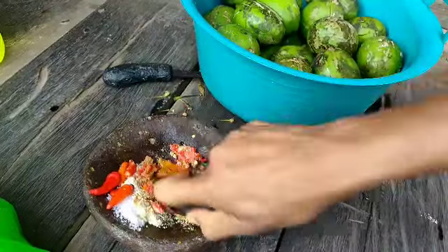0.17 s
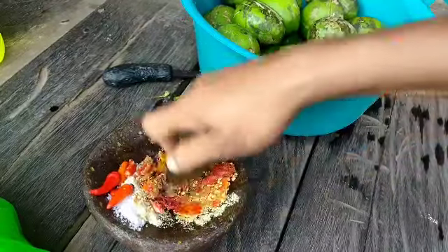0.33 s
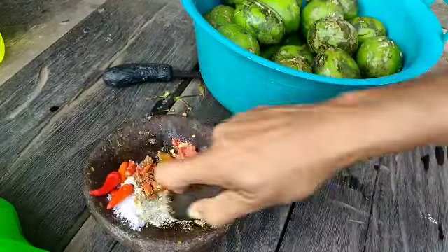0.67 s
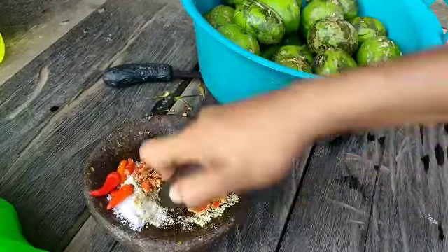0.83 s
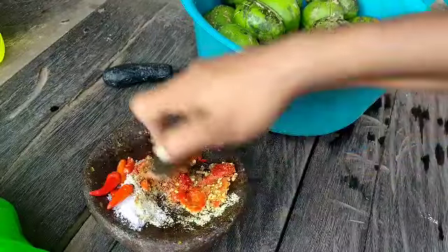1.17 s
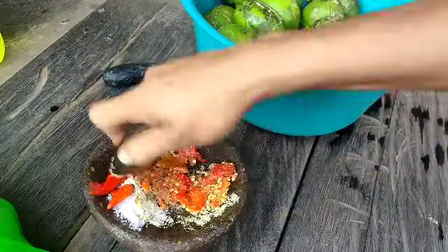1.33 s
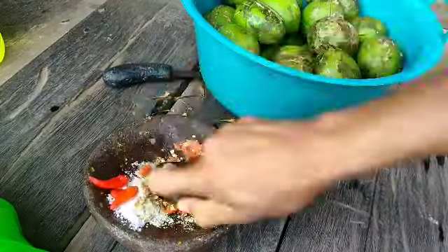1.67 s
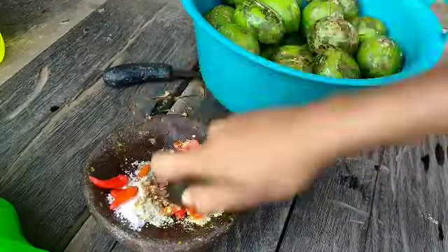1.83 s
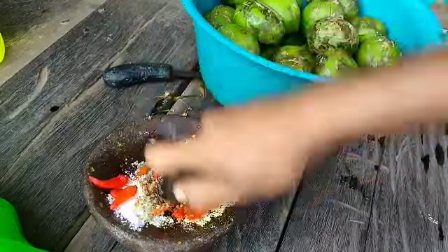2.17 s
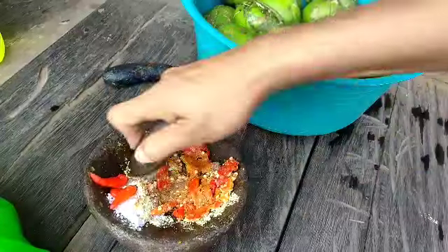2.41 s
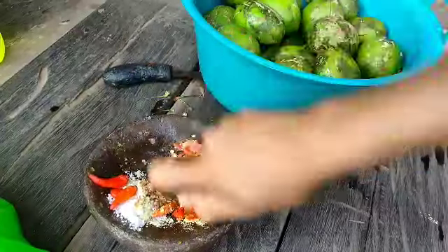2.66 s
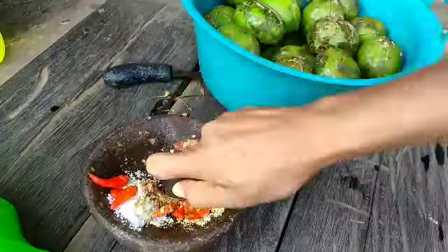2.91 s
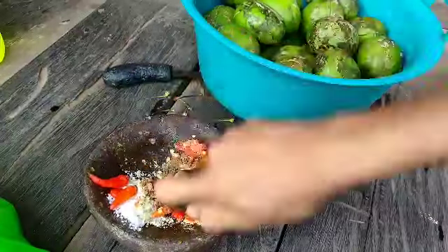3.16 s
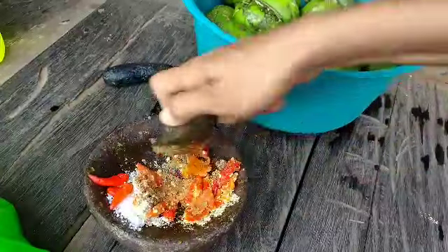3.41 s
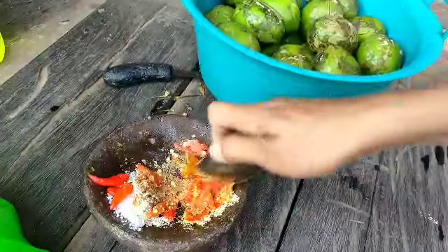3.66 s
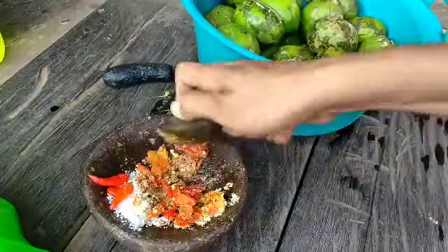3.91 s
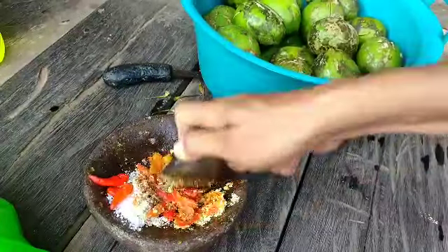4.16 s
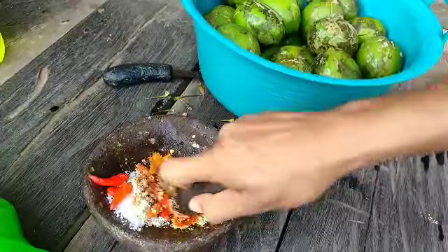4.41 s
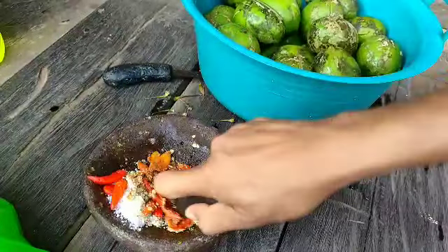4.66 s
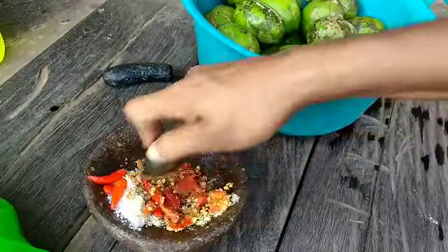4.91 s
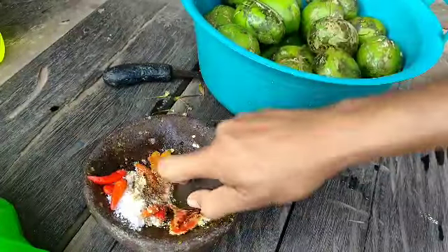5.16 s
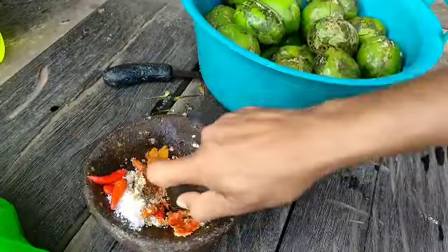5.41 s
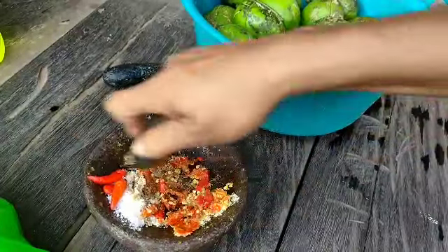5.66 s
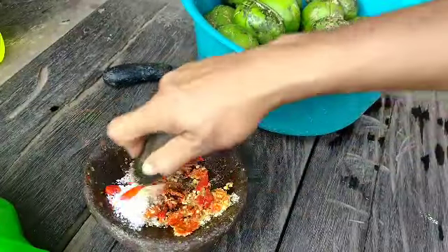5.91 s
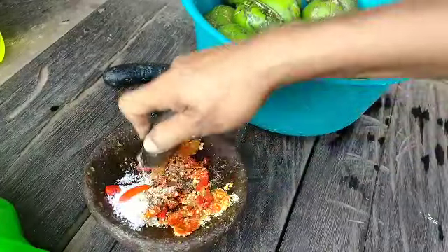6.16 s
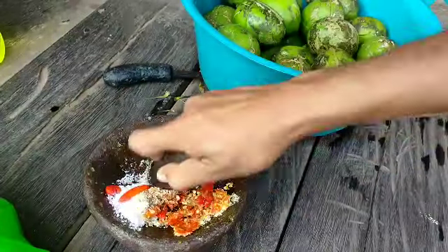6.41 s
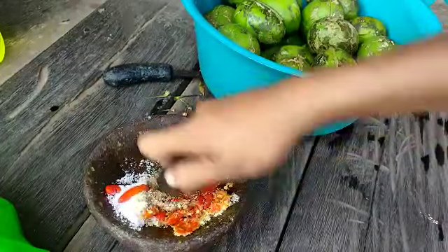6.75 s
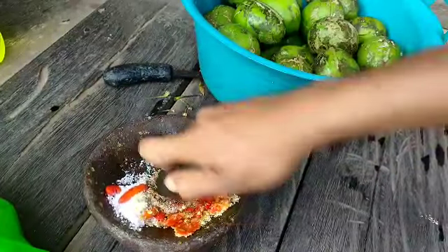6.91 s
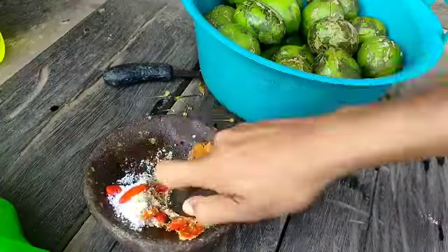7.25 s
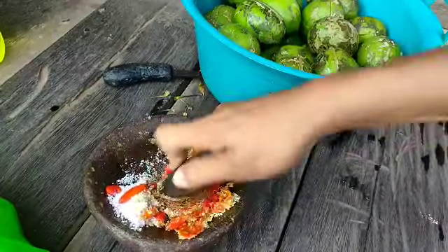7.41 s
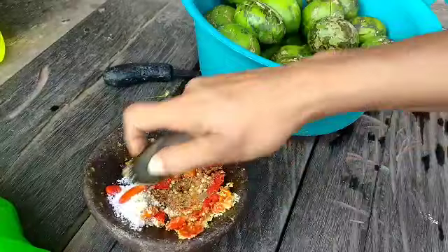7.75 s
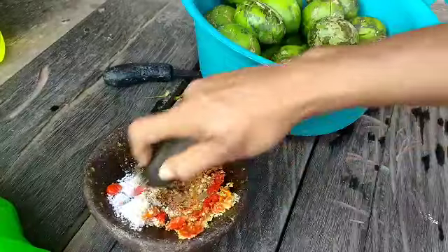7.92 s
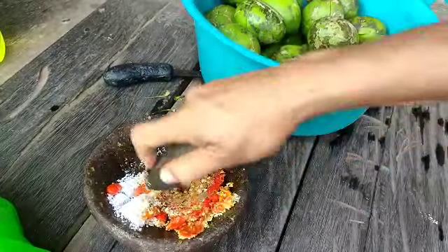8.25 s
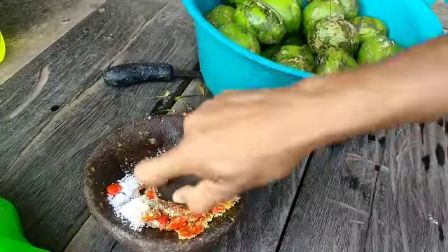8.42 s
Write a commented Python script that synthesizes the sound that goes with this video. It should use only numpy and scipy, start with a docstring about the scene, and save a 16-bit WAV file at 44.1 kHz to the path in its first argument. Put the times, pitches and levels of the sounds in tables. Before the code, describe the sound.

Irregular grinding, several strokes a second, stone against stone with gritty salt crackling between. Woody, hollow thumps pass into the table, small cracks and clacks dot the rubbing, and a pair of hard knocks stands out near the end before the work softens. The microphone is close and dry, in quiet open air, with thin distant insect bands, a weak sliding cicada buzz and low wind flutters on the right.

```python
"""Outdoors at a plank table, a stone pestle grinds chilies, spices and salt in a shallow stone mortar.
Each push rolls grit, as tiny jolts that ring the modes of mortar and planks, while salt crunches in noise
bursts and hard grains rasp. Seeds snap, the stones clack, and now and then the pestle knocks.
Far insects sing in shimmering noise bands, a nearer cicada buzzes in a narrow one, and puffs of air buffet
the right microphone port."""
import sys
import numpy as np
from scipy import signal
from scipy.fft import rfft, irfft, next_fast_len
from scipy.io import wavfile
from scipy.ndimage import uniform_filter1d, map_coordinates

SR = 44100
rng = np.random.default_rng(int(sys.argv[2]) if len(sys.argv) > 2 else 0)


def output_pcm(signal):
    """Save a mono or channel-first signal as 16-bit PCM at the path in sys.argv[1].

    Samples are clipped to [-1, 1] before scaling.
    """
    pcm = np.clip(np.atleast_2d(signal).T, -1, 1) * 32767
    wavfile.write(sys.argv[1], SR, np.round(pcm).astype(np.int16))


N = 378201
TIME = np.arange(N) / SR


def from_db(db):
    """Decibels to gain."""
    return 10 ** (np.asarray(db) / 20)


def rms_one(x):
    """Scale to unit rms."""
    return x / np.sqrt(np.mean(x ** 2) + 1e-20)


def in_time(rows):
    """Each column of a curve, interpolated sample by sample."""
    s, *columns = np.transpose(rows)
    return [np.interp(TIME, s, column) for column in columns]


def coloured(x, spectrum):
    """Causal (minimum-phase) filter that follows a spectrum."""
    size = next_fast_len(x.shape[-1] + 4096)
    hz, db = np.transpose(spectrum)
    bin_hz = np.abs(np.fft.fftfreq(size, 1 / SR))
    bin_db = np.interp(np.log(bin_hz + 1), np.log(hz), db)
    log_gain = np.log(from_db(bin_db))
    # the Hilbert transform of the log gain gives the minimum phase
    response = np.exp(np.conj(signal.hilbert(log_gain)))[:size // 2 + 1]
    return irfft(rfft(x, size) * response, size)[..., :x.shape[-1]]


def low_pass(x, hz):
    """Two-pole low-pass."""
    return signal.sosfilt(signal.butter(2, min(hz, SR / 2 - 1), fs=SR, output="sos"), x)


def band_pass(x, low_hz, high_hz):
    """Band-pass with gentle slopes."""
    return signal.sosfilt(signal.butter(2, [low_hz, high_hz], "band", fs=SR, output="sos"), x)


def drift(per_s):
    """Random wandering: straight lines between random knots of unit spread."""
    knots = rng.standard_normal(N // 10)
    return np.interp(TIME * per_s, np.arange(len(knots)), knots)


def add(track, s, sound):
    """Mix a short sound into a track at time s."""
    start = max(round(s * SR), 0)
    part = sound[:max(N - start, 0)]
    track[start:start + len(part)] += part


def grains(per_s, spread_db):
    """Random clicks of either sign and uneven size, with unit power at any rate."""
    born = rng.random(N) < per_s / SR
    sizes = from_db(spread_db * np.minimum(rng.exponential(1, N), 4))
    signs = rng.choice([-1, 1], N)
    return rms_one(born * sizes * signs / np.sqrt(per_s))


def evened(x, window_s):
    """Hold the short-term power at one, keeping the faster grain."""
    power = np.abs(uniform_filter1d(x ** 2, int(window_s * SR) + 1))
    return x / np.sqrt(power + 1e-12)


def patchy(x, depth_db, patch_hz, patch_s):
    """Let each stretch of the spectrum swell and fade by itself."""
    hz, s, spectra = signal.stft(x, SR, nperseg=512)
    field = rng.standard_normal((256, 1024))
    places = np.meshgrid(hz / patch_hz, s / patch_s, indexing="ij")
    gain_db = depth_db * map_coordinates(field, places, order=1, mode="wrap")
    return rms_one(signal.istft(spectra * from_db(gain_db), SR)[1][..., :N])


def scattered(x, level_db, t60):
    """The direct sound plus a dying spray of reflections, different at each port."""
    t = TIME[:SR // 2]
    spray = rng.standard_normal((2, len(t))) * from_db(-60 * t / t60) * (1 - np.exp(-t / 0.02))
    spray /= np.sqrt(np.sum(spray ** 2, axis=1, keepdims=True))
    return x + from_db(level_db) * signal.fftconvolve(x[None], spray, axes=1)[:, :N]


def far_noise(spectrum):
    """Diffuse sound from all around: mostly independent noise at the two ports, unit rms."""
    noise = rng.standard_normal((2, N)) + 0.14 * rng.standard_normal(N)
    return rms_one(coloured(noise, spectrum))


# colour of the open air: f/Hz, relative level/dB
AIR_COLOUR = [(30, 3.5), (90, 0.5), (200, -7.5), (600, -14), (1300, -31.5), (4000, -32), (15000, -29)]


def open_air(level_db):
    """The steady hush of the place, as diffuse coloured noise."""
    return from_db(level_db) * far_noise(AIR_COLOUR)


def chorus(spectrum, pitch=None):
    """A shimmering band of far insects, its peak sliding along the pitch curve if it has one."""
    band = patchy(far_noise(spectrum), depth_db=4.5, patch_hz=150, patch_s=0.09)
    if pitch is None:
        return band
    peak_hz = max(spectrum, key=lambda point: point[1])[0]
    shift_hz = in_time(pitch)[0] - peak_hz
    turn = np.exp(2j * np.pi * np.cumsum(shift_hz) / SR)
    return np.real(signal.hilbert(band, next_fast_len(N))[:, :N] * turn)


# colour of each far chorus, low and high before they slide: f/Hz, relative level/dB
LOW_COLOUR = [(1850, -43), (2100, 0.5), (2500, 6), (2900, 2), (3300, -4), (4000, -44)]
MIDDLE_COLOUR = [(2500, -41.5), (3200, 0.5), (3800, -2.5), (4400, 4.5), (4900, -3), (6000, -34.5)]
HIGH_COLOUR = [(3900, -28), (4500, 0.5), (5100, 3.5), (5450, -1), (6100, 0.5), (6900, -8), (8000, -13),
               (15000, -31.5)]
# sliding pitch of the low and the high chorus: t/s, peak f/Hz
LOW_SLIDE = [(0.0, 2675), (0.881, 2950), (1.321, 2330), (1.55, 2930), (2.121, 3200), (2.451, 2970),
             (2.7, 2532), (3.349, 2600), (3.6, 3090), (3.92, 2300), (4.25, 2627), (6.0, 2370), (6.6, 2640),
             (8.5, 2400)]
HIGH_SLIDE = [(0.8, 5480), (2.65, 5120), (7.5, 5153), (7.8, 5636), (8.1, 5370), (8.452, 5850)]
# swelling of the choruses: t/s, relative level/dB of the low, the middle and the high one
CHORUS_LEVELS = [(0.0, -86, -67, -65), (0.31, -70, -60, -60), (0.55, -76, -78, -74), (0.8, -70, -63, -55),
                 (1.1, -67, -88, -85), (1.33, -66.5, -77, -77), (1.6, -60.5, -70, -70),
                 (2.101, -65, -78, -72), (2.4, -71, -79, -84), (2.67, -64.5, -80, -61),
                 (3.22, -67, -64.5, -62.5), (3.45, -68.5, -79, -65.5), (3.651, -59.5, -62.5, -69.5),
                 (3.901, -60.5, -64.5, -62), (4.051, -72.5, -61.5, -67), (4.4, -60.5, -63.5, -60.5),
                 (4.751, -71, -68.5, -65), (4.95, -62, -57.5, -62), (5.2, -78, -56.5, -91),
                 (5.55, -74, -63.5, -67.5), (5.73, -70, -54.5, -58.5), (5.88, -84, -65, -70.5),
                 (6.0, -48, -56, -64.5), (6.1, -72.5, -72, -68), (6.2, -81, -103, -83),
                 (6.451, -71, -87.5, -68), (6.599, -67.5, -56.5, -79), (6.85, -62, -66, -72),
                 (7.091, -80, -94, -68), (7.35, -69.5, -63, -76), (7.601, -65, -60.5, -61.5),
                 (7.8, -74, -65.5, -54), (8.1, -64, -65, -60), (8.58, -82, -73, -58.5)]


def insects(low_db, middle_db, high_db):
    """Three far choruses of filtered noise swell and fade, the upper two leaning left."""
    low_level, middle_level, high_level = in_time(CHORUS_LEVELS)
    low = from_db(low_db + low_level) * chorus(LOW_COLOUR, LOW_SLIDE)
    middle = from_db(middle_db + middle_level) * chorus(MIDDLE_COLOUR)
    high = from_db(high_db + high_level) * chorus(HIGH_COLOUR, HIGH_SLIDE)
    return low + (middle + high) * from_db([[1.2], [-1.2]])


# calls of the nearest cicada, each lasting until the next begins:
# start t/s, starting f/Hz, final f/Hz, relative level/dB
CICADA_CALLS = [(0.0, 6500, 6280, -45.5), (0.386, 5720, 6450, -52), (1.082, 5770, 6600, -56.5),
                (1.719, 5770, 6550, -56), (2.42, 5700, 6450, -54.5), (3.68, 5820, 6300, -54),
                (4.746, 5740, 6300, -68), (5.781, 5830, 5700, -54.5), (6.239, 6160, 6250, -53.5),
                (6.68, 5900, 6480, -53), (7.348, 6030, 6380, -56.5), (8.051, 5860, 6500, -59)]
# every call slides along the same bend, sinks by a couple of dB, and fades in and out
CALL_BEND, CALL_SINK_DB, CALL_FADE_S = 1.8, 2, 0.026


def cicada(level_db, half_width_hz, waver_db, pan_db):
    """A narrow buzzing noise band that slides in every call and wavers, arriving diffusely at both ports."""
    pitch_hz, loudness = np.zeros(N), np.zeros(N)
    ends = [row[0] for row in CICADA_CALLS[1:]] + [N / SR]
    for (s, start_hz, end_hz, db), end_s in zip(CICADA_CALLS, ends):
        during = (TIME >= s) & (TIME < end_s)
        t = TIME[during]
        progress = (t - s) / (end_s - s)
        fade = np.minimum(np.minimum(t - s, end_s - t) / CALL_FADE_S, 1)
        pitch_hz[during] = start_hz + (end_hz - start_hz) * progress ** CALL_BEND
        loudness[during] = from_db(db + CALL_SINK_DB * (1 - progress)) * np.sqrt(fade)
    buzz = low_pass(rng.standard_normal((2, N)) + 1j * rng.standard_normal((2, N)), half_width_hz)
    song = rms_one(np.real(buzz * np.exp(2j * np.pi * np.cumsum(pitch_hz) / SR)))
    return loudness * from_db(level_db + waver_db * drift(13)) * song * from_db([[pan_db], [-pan_db]])


# colour of the turbulence at the port: f/Hz, relative level/dB
BUFFET_COLOUR = [(15, -32), (45, 0.5), (100, 12), (190, 3.5), (300, -5.5), (500, -23), (1200, -39.5),
                 (4000, -61)]
# puffs of air on the right port: peak t/s, half length t/s, relative level/dB, eddy rate f/Hz
AIR_PUFFS = [(0.475, 0.018, -49.5, 98.96), (0.558, 0.016, -37.5, 96.7), (0.657, 0.02, -49, 103.8),
             (0.689, 0.0047, -34, 123.4), (0.719, 0.0087, -45, 173.9), (0.789, 0.025, -44, 100.4),
             (1.253, 0.035, -52.5, 99.8), (1.262, 0.0049, -39, 162.4), (2.006, 0.02, -50, 78.45),
             (2.056, 0.007, -38.5, 111), (3.412, 0.035, -56.5, 86.15), (4.88, 0.014, -29.5, 173.7),
             (4.958, 0.045, -40, 110), (4.975, 0.0046, -31, 118.9), (5.621, 0.038, -54, 102)]


def wind(level_db, leak_db, wander_octaves, turbulence_db):
    """Moving air sheds eddies on the right port at an unsteady rate; it barely reaches the left."""
    powers = []
    for s, half_s, db, _ in AIR_PUFFS:
        powers.append(from_db(2 * db) * np.exp(-np.minimum(((TIME - s) / half_s) ** 2, 50)))
    powers = np.array(powers)
    power = powers.sum(axis=0)
    # where puffs overlap, the stronger one weighs more in the rate
    puff_hz = np.array(AIR_PUFFS)[:, 3] @ powers / power
    rate_hz = puff_hz * 2 ** (wander_octaves * drift(150))
    eddies = np.sqrt(2) * np.sin(2 * np.pi * np.cumsum(rate_hz) / SR)
    turbulence = evened(coloured(rng.standard_normal((2, N)), BUFFET_COLOUR), window_s=0.0178)
    gust = np.sqrt(power) * (eddies + from_db(turbulence_db) * turbulence)
    return from_db(level_db) * gust * from_db([[leak_db], [0]])


# how the two ports hear the mortar: f/Hz, left minus right level/dB
PORT_DIFFERENCE = [(80, -5), (250, -4), (600, -2.2), (1500, 3), (2700, -2), (4500, -1), (6400, 8),
                   (7400, 1), (8700, -17), (10500, -3.5), (13000, -1)]


def at_ports(near):
    """Each port colours the close sounds by half of the difference, in opposite senses."""
    left = coloured(near[0], [(hz, db / 2) for hz, db in PORT_DIFFERENCE])
    right = coloured(near[1], [(hz, -db / 2) for hz, db in PORT_DIFFERENCE])
    return np.array([left, right])


# colour of a cracking seed: f/Hz, relative level/dB
CRACK_COLOUR = [(600, -39.5), (1500, -3.5), (4000, -5.5), (7000, 1.5), (9000, -7), (12000, -14),
                (16000, -20)]
# seeds and large crystals snap: t/s, relative crack level/dB, relative hollow pop level/dB, t60/s
SEED_SNAPS = [(0.1138, -16.5, -51.5, 0.034), (0.376, -28.5, -62, .04), (0.396, -19, -52.5, 0.11),
              (0.459, -32, -48, 0.051), (0.477, -21.5, -48, 0.13), (0.9595, -32, -70, 0.1),
              (1.223, -23.5, -55, 0.12), (1.471, -23, -56, 0.33), (1.6998, -23, -52.5, .05),
              (2.552, -12.5, -65, 0.041), (2.577, -17, -78, 0.044), (3.777, -30, -62, 0.034),
              (4.6826, -19.5, -56.5, 0.043), (4.855, -34, -48.5, 0.028), (7.82, -43, -53.5, 0.051),
              (8.072, -16, -50.5, 0.048), (8.5675, -9.5, -39, 0.017)]


def snaps(crack_db, pop_db, pop_hz):
    """A seed gives way in a short dying burst of noise, with a hollow pop under it."""
    cracks, pops, t = np.zeros(N), np.zeros(N), TIME[:SR // 10]
    for s, db, hollow_db, t60 in SEED_SNAPS:
        add(cracks, s, from_db(db + crack_db - 60 * t / t60))
        add(pops, s, from_db(hollow_db + pop_db - 60 * t / t60))
    crack = coloured(cracks * rng.standard_normal((2, N)), CRACK_COLOUR)
    pop = band_pass(pops * rng.standard_normal(N), pop_hz / 1.19, pop_hz * 1.12)
    return crack + pop


# stone meets bare stone: t/s, relative level/dB, centre f/Hz
STONE_CLACKS = [(0.02, -48, 1110), (0.378, -48.5, 1850), (0.478, -47, 1030), (0.842, -44.5, 1050),
                (2.185, -45.5, 1000), (2.808, -41, 866), (3.099, -47, 1220), (3.495, -49.5, 1660),
                (3.775, -49.5, 760), (4.348, -58, 937), (4.525, -41, 766), (4.681, -51, 914),
                (4.856, -44.5, 1140), (5.044, -54.5, 1020), (5.364, -50.5, 746), (5.97, -43, 2080),
                (5.989, -44, 2080), (6.477, -48.5, 1130), (6.765, -47, 1180), (7.822, -55, 980),
                (8.072, -46.5, 1577)]


def clacks(level_db, t60, width_ratio):
    """Bare stone chatters on stone in a dry noise burst; the place of contact sets the pitch."""
    out, t = np.zeros(N), TIME[:SR // 8]
    ratio = max(width_ratio, 1.05)
    for s, db, hz in STONE_CLACKS:
        chatter = rng.standard_normal(len(t)) * from_db(-60 * t / t60)
        add(out, s, from_db(db + level_db) * rms_one(band_pass(chatter, hz / ratio, hz * ratio)))
    return out


# modes of mortar and planks; the bowl is not quite round, so they come in beating pairs:
# centre f/Hz, split f/Hz, relative level/dB, t60/s
MORTAR_MODES = [(91, 4.5, -14.5, 0.44), (139.75, 14, -28, 0.6), (173, 34, -18.5, 0.23),
                (231.7, 24, -20.5, 0.087), (330, 24, -10.5, 0.093), (383, 8.3, -9, 0.15),
                (497.4, 14, -16.5, 0.15), (553.6, 7, -22.5, 0.16), (685, 64, -1.5, 0.075),
                (783, 83, -21.5, 0.12), (954, 5.7, -26.5, 0.12), (1113, 54, -13.5, 0.063),
                (1340, 14, -19, 0.055), (1660, 31, -11, 0.014)]


def mortar_modes(build_cycles):
    """The answer of each mode of mortar and table to one blow; the low modes build up slowly."""
    t, out = TIME[:SR // 2], []
    for k, (hz, split_hz, db, t60) in enumerate(MORTAR_MODES):
        pair = np.sin(2 * np.pi * hz * t) * np.cos(np.pi * split_hz * t)
        build = 1 - np.exp(-t * hz / build_cycles)
        polarity = -(-1) ** k
        out.append(polarity * from_db(db - 60 * t / t60) * build * pair)
    return out


# the spot under the pestle favours the modes within this many octaves
FOCUS_OCTAVES = 0.68


def favoured(hz, spot_hz, focus_db):
    """Gain of a mode: those near the pitch of the spot under the pestle are lifted most."""
    return from_db(focus_db * np.exp(-(np.log2(hz / spot_hz) / FOCUS_OCTAVES) ** 2))


# the pestle lands: t/s, relative level/dB, contact cut-off f/Hz (low when cushioned by paste),
# f/Hz that the spot favours
PESTLE_KNOCKS = [(0.2306, -22, 1150, 650), (0.819, -33.5, 1000, 885), (0.959, -45, 1100, 330),
                 (1.061, -46, 1100, 690), (1.084, -47.5, 1010, 690), (1.421, -37.5, 950, 179),
                 (2.038, -44, 950, 406), (2.226, -41.5, 410, 260), (2.4947, -32, 1213, 488),
                 (2.562, -33.5, 418, 510), (2.698, -36.5, 1050, 738), (2.718, -34.5, 400, 370),
                 (2.809, -43.5, 1500, 503), (2.865, -48, 480, 230), (3.097, -39, 1134, 303),
                 (3.118, -33.5, 300, 248.6), (3.308, -37, 397, 284), (3.502, -45.5, 1240, 520),
                 (3.676, -33, 196, 165), (3.691, -45, 999, 180), (4.095, -42.5, 450, 445),
                 (4.741, -35.5, 930, 660), (5.496, -41.5, 986, 712), (6.283, -41.5, 194, 172.4),
                 (6.733, -41, 277, 220), (7.1552, -19.5, 2280, 810), (7.3602, -18.5, 2610, 795),
                 (8.123, -49, 451, 262), (8.567, -42.5, 2000, 900)]


def knocks(level_db, focus_db):
    """Each landing is one push, rounded by the paste under the pestle; the place weights the modes."""
    out = np.zeros(N)
    modes = np.array(mortar_modes(build_cycles=0.65))
    hz = np.array(MORTAR_MODES)[:, 0]
    for s, db, contact_hz, spot_hz in PESTLE_KNOCKS:
        ring = favoured(hz, spot_hz, focus_db) @ modes
        add(out, s, from_db(db + level_db) * low_pass(ring, contact_hz))
    return out


def swells(s, half_s, db, release_ratio):
    """Summed power of movements that each rise to a peak and fade."""
    t = TIME[::32]
    phase = (t[:, None] - s) / half_s
    phase = np.where(phase > 0, phase / release_ratio, phase)
    power = np.cosh(np.clip(phase, -20, 20)) ** -2 @ from_db(db) ** 2
    return np.interp(TIME, t, power)


# pushes of the pestle: peak t/s and half length t/s (before the lag and ratio below for the rumble),
# relative rumble level/dB, relative crunch level/dB, f/Hz that the spot favours
PESTLE_STROKES = [(0.027, 0.029, -46.5, -53.5, 99), (0.155, 0.029, -53, -58, 784),
                  (0.257, 0.018, -40, -52.5, 398), (0.347, 0.094, -61.5, -69, 700),
                  (0.667, 0.032, -57.5, -60.5, 520), (0.738, 0.014, -46.5, -56, 630),
                  (0.842, 0.027, -43, -57.5, 840), (0.963, 0.014, -54, -57, 330),
                  (1.05, 0.054, -59, -64, 610), (1.182, 0.02, -68, -66, 450), (1.514, 0.063, -62, -60, 165),
                  (1.731, 0.02, -50, -49.5, 696), (1.84, 0.023, -50, -53, 583),
                  (1.938, 0.032, -55, -58.5, 108.4), (2.053, 0.019, -51, -56.5, 268),
                  (2.168, 0.041, -54, -54.5, 900), (2.283, 0.027, -56.5, -64.5, 380),
                  (2.558, 0.026, -43.5, -54.5, 504), (2.703, 0.034, -50.5, -59.5, 236),
                  (2.826, 0.061, -52.5, -62, 540), (2.985, 0.021, -47, -53, 220),
                  (3.118, 0.025, -48, -63, 326), (3.278, 0.049, -54.5, -54, 610),
                  (3.502, 0.099, -59.5, -74, 202), (3.691, 0.0098, -49, -76, 130),
                  (3.772, 0.05, -58.5, -56.5, 120), (4.157, 0.039, -54, -57, 128.8),
                  (4.25, 0.051, -64.5, -80, 560), (4.424, 0.03, -83, -62.5, 702),
                  (4.531, 0.026, -52, -55.5, 720), (4.66, 0.019, -52, -57, 390),
                  (4.752, 0.025, -47, -54, 665), (4.86, 0.017, -45, -59, 300),
                  (5.17, 0.041, -60, -58.5, 800), (5.282, 0.038, -56.5, -58, 790),
                  (5.406, 0.026, -51.5, -54.5, 700), (5.481, 0.026, -47.5, -59, 743),
                  (5.613, 0.16, -64.5, -70.5, 506), (5.995, 0.023, -56, -51.5, 187),
                  (6.065, 0.1, -61.5, -78, 494), (6.266, 0.0079, -66.5, -60, 180.7),
                  (6.335, 0.027, -63, -54.5, 180), (6.499, 0.034, -54.5, -66, 550),
                  (6.627, 0.023, -49, -54.5, 635), (6.75, 0.026, -48, -59.5, 219),
                  (6.857, 0.036, -54.5, -63, 453), (6.973, 0.031, -50, -60, 660),
                  (7.091, 0.018, -50.5, -59, 98.8), (7.179, 0.016, -39, -56, 658),
                  (7.297, 0.03, -51.5, -61, 397), (7.385, .022, -44.5, -58.5, 680),
                  (7.506, 0.09, -59, -68.5, 96.8), (7.784, 0.061, -84, -70.5, 702),
                  (7.989, 0.064, -90, -63, 700), (8.146, 0.029, -61, -84, 1100),
                  (8.247, 0.014, -63, -63, 446), (8.373, 0.045, -70.5, -61, 445),
                  (8.52, 0.058, -61, -64, 703)]
# the stone rumbles once the salt has given way
RUMBLE_LAG_S, RUMBLE_LENGTH_RATIO = 0.004, 0.87
# grit rasps where the pestle both presses on stone and meets salt
RASP_DB, RASP_STONE_SHARE = -9.5, 0.72


def pushes(stick_db):
    """Rumble, rasp and crunch amplitudes: pushes swell and fade, and under a light hand the pestle sticks."""
    s, half_s, stone_db, salt_db, _ = np.transpose(PESTLE_STROKES)
    rumble = swells(s + RUMBLE_LAG_S, half_s * RUMBLE_LENGTH_RATIO, stone_db, release_ratio=0.92)
    crunch = swells(s, half_s, salt_db, release_ratio=1.017)
    rasp = from_db(RASP_DB) ** 2 * rumble ** RASP_STONE_SHARE * crunch ** (1 - RASP_STONE_SHARE)
    # below the sticking level the amplitude falls twice as fast in dB
    return [power / np.sqrt(power + from_db(db) ** 2)
            for power, db in zip((rumble, rasp, crunch), stick_db)]


# colour of the scratches: f/Hz, relative level/dB
RASP_COLOUR = [(500, -24), (800, -8.5), (1100, -0.5), (1400, -2.5), (1750, -17.5), (2100, -5), (2700, -8),
               (3600, -2), (6000, -30.5)]


def rasping(force, level_db, scratches_per_s, judder_db):
    """Hard grains caught between the two stones scratch in short, dry ticks."""
    scratches = grains(scratches_per_s, spread_db=3.0) * from_db(judder_db * drift(140))
    return from_db(level_db) * force * evened(coloured(scratches, RASP_COLOUR), window_s=0.058)


# colour of breaking salt: f/Hz, relative level/dB
CRUNCH_COLOUR = [(700, -23), (1300, -34.5), (1900, -7.5), (2600, 1), (3900, -8), (5200, -3.5), (6600, 0),
                 (8800, -3), (10200, -9), (12000, -14.5), (15500, -17)]
# time constant in which the energy of one break dies
BREAK_S = 0.0014


def crunching(force, level_db, breaks_per_s):
    """Crystals break, more of them as the pestle bears down; each break is a tiny burst of noise."""
    rate = breaks_per_s * np.sqrt(force / force.max() + 1e-4)
    breaks = grains(rate, spread_db=3.4) * from_db(1.3 * drift(70))
    decay = np.exp(-1 / (BREAK_S * SR))
    bursts = np.sqrt(signal.lfilter([1], [1, -decay], breaks ** 2 + 1e-12))
    noise = coloured(rng.standard_normal((2, N)) + 0.44 * rng.standard_normal(N), CRUNCH_COLOUR)
    # coarse and fine crystals come under the pestle in turn, so the colour shifts
    grit = patchy(noise, depth_db=3.8, patch_hz=700, patch_s=0.035)
    return from_db(level_db) * force * evened(bursts, window_s=0.034) * grit


# colour of the jolts that drive the mortar: f/Hz, relative level/dB
JOLT_COLOUR = [(40, -15), (90, 5), (160, 11), (250, 12.5), (380, -2.5), (520, 3), (690, -5.5), (850, 2.5),
               (1100, -3.5), (1500, -9.5), (2200, -10)]


def rubbing(force, level_db, slips_per_s, judder_db, focus_db):
    """The pestle slips over grit in jolts that ring the mortar; as it travels, other modes take over."""
    slips = grains(slips_per_s, spread_db=-1.0) * from_db(judder_db * drift(90))
    jolts = coloured(slips, JOLT_COLOUR)
    spot_hz = in_time(PESTLE_STROKES)[-1]
    rumble = np.zeros(N)
    for row, mode in zip(MORTAR_MODES, mortar_modes(build_cycles=0.1)):
        rumble += signal.oaconvolve(jolts, mode)[:N] * favoured(row[0], spot_hz, focus_db)
    return from_db(level_db) * force * evened(rms_one(rumble), window_s=0.032)


def scene():
    """The mortar close by, insects and air around it."""
    far = open_air(level_db=-77.0) + insects(low_db=1.0, middle_db=1.0, high_db=2.0)
    far = far + cicada(level_db=-11.0, half_width_hz=120, waver_db=1.3, pan_db=2.5)
    puffs = wind(level_db=5.5, leak_db=-53, wander_octaves=0.44, turbulence_db=-2.5)

    seeds = snaps(crack_db=-18, pop_db=17.0, pop_hz=2600)
    contacts = clacks(level_db=-18.5, t60=0.062, width_ratio=1.266)
    contacts = scattered(contacts, level_db=-2.5, t60=0.13)
    rumble, rasp, crunch = pushes(stick_db=(-65, -72, -74))
    grit = rasping(rasp, level_db=-4.0, scratches_per_s=600, judder_db=6.0)
    grit = scattered(grit, level_db=0.0, t60=0.04)
    # breaks_per_s holds under the hardest push
    salt = crunching(crunch, level_db=7.0, breaks_per_s=2600)
    stone = rubbing(rumble, level_db=2.0, slips_per_s=480, judder_db=9.0, focus_db=5)
    stone = scattered(stone + knocks(level_db=1.5, focus_db=6), level_db=-13.5, t60=0.12)
    return far + puffs + at_ports(seeds + contacts + grit + salt + stone)


def record(dry):
    """The top is cut steeply above 15.6 kHz."""
    return signal.sosfilt(signal.ellip(10, 0.1, 70, 15600, fs=SR, output="sos"), dry)


dry = scene()
out = record(dry)
output_pcm(out)
```